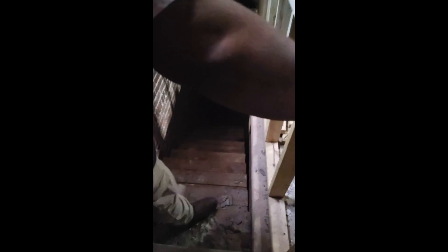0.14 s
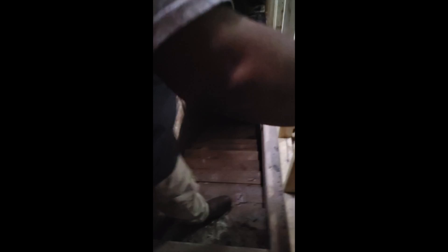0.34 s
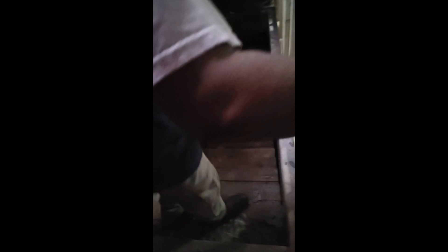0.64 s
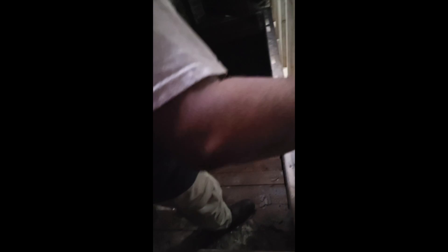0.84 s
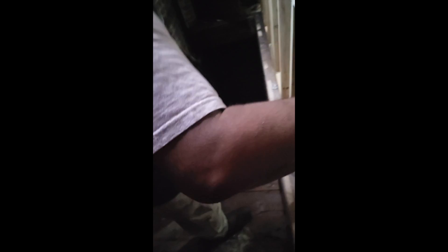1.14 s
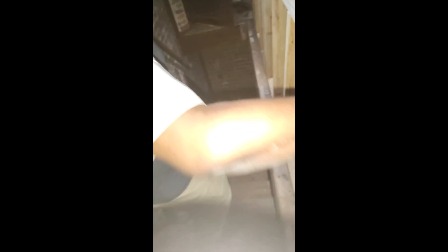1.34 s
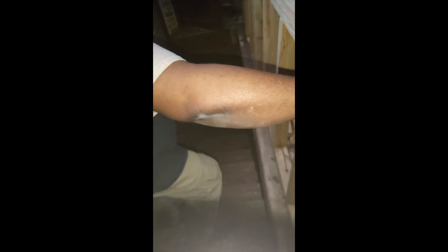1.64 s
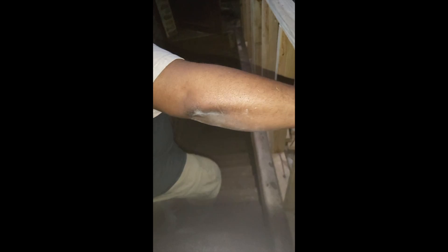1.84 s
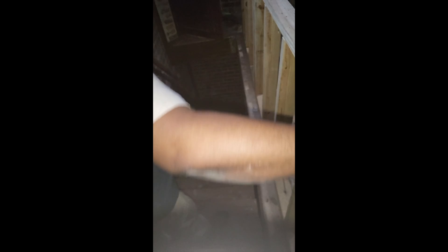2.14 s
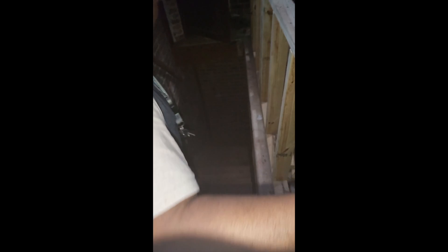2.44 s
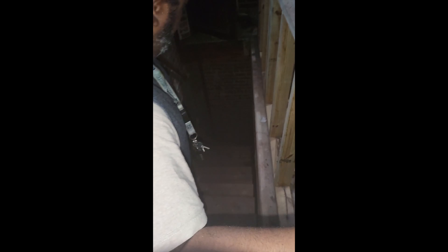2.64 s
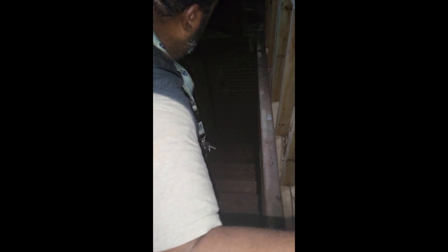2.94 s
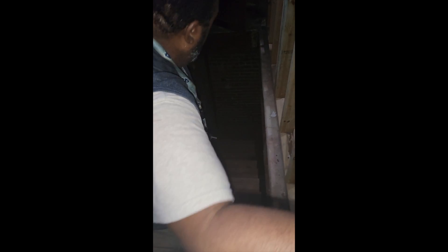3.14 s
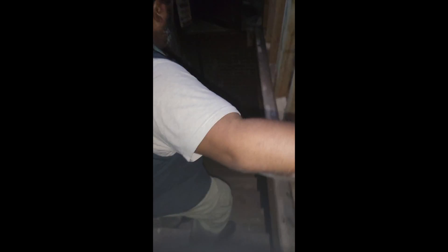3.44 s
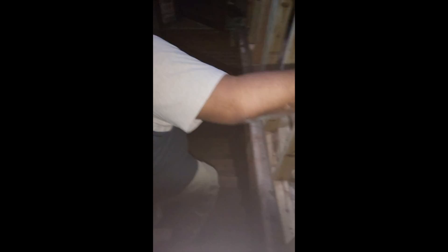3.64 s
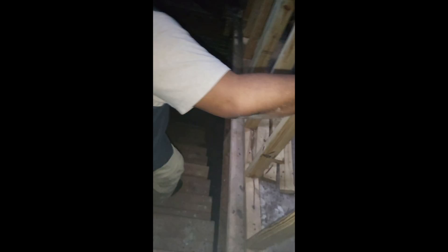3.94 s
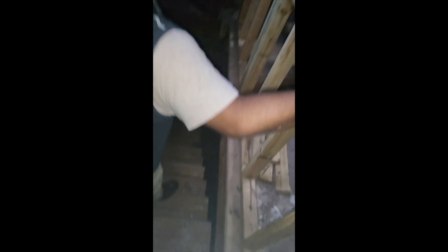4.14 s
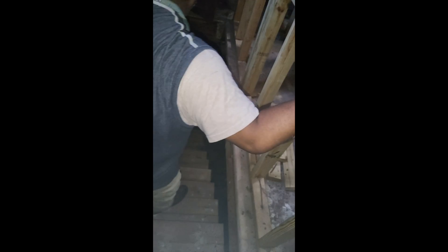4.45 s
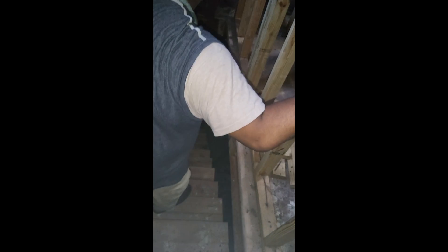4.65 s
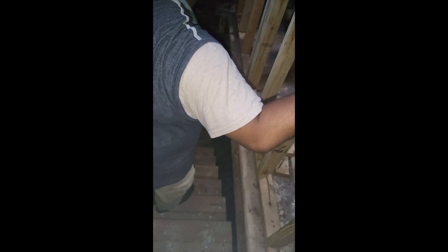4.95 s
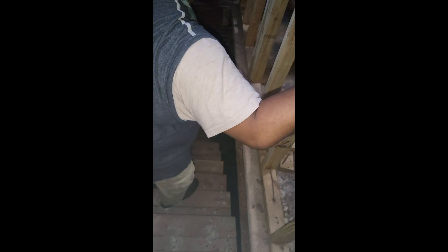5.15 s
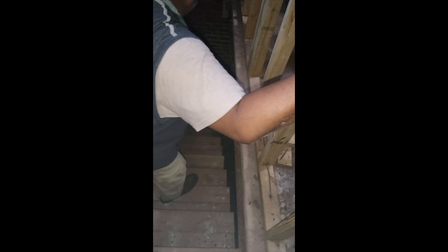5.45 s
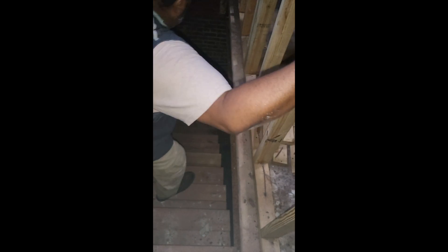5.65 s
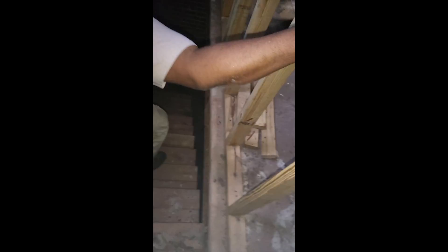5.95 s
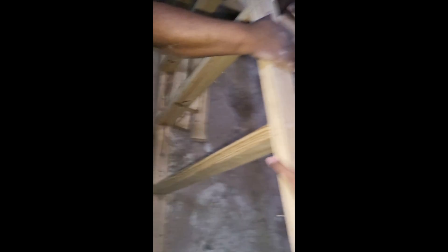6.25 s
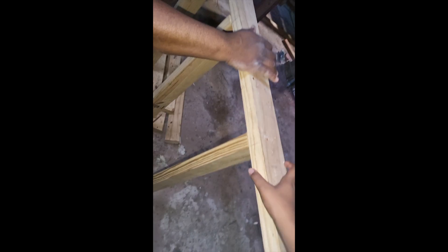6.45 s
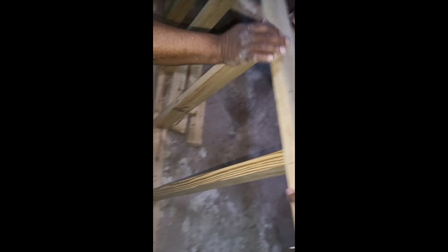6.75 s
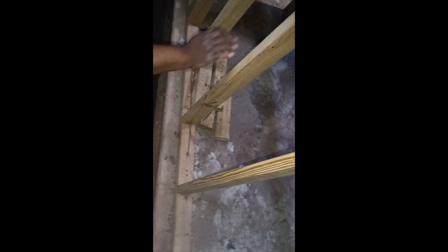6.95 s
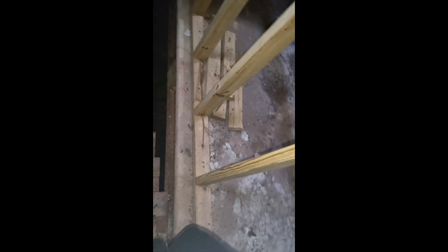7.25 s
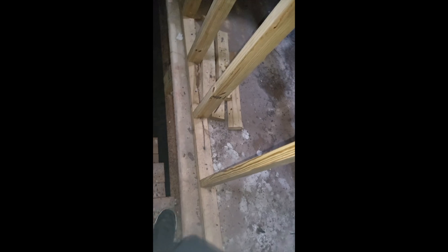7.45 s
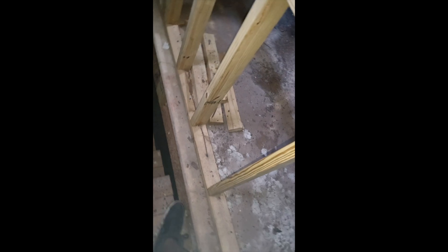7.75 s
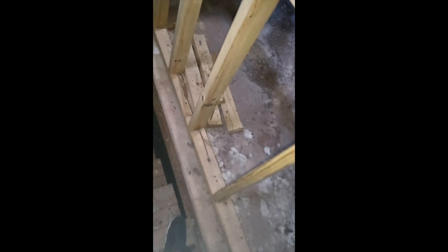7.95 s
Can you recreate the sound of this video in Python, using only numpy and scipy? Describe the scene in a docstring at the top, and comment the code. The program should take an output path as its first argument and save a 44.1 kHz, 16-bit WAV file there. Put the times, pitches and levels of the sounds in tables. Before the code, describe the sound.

A handheld stereo microphone follows someone on gritty wooden steps in a bare room with a short reverberant tail. A faint low hum runs throughout, with a low drone swelling around 0.4 seconds. After a soft scuff and small clicks, a snap at 1.1 leads into a double heel thud at 1.25, booming through the stair frame; tiny metal jingles faintly at 1.4. A sharp, loud snap strikes at 2.2. Another firm double thud with clicks and scrape comes at 3.15, then a brighter jingle at 3.45 and a soft whistling slide near 3.7. Rustle and a dull step follow at 4, then sparse small knocks and a thin far hiss. From 5.6 to 7.1, a strong sole drag opens a dense flurry of handling clicks, brushes and cloth. Light timber taps sound between 7.3 and 7.8, with a soft heel at 7.75 and closing gritty scuffs and a click near 8.

```python
"""Someone walks on gritty wooden steps in a bare building, followed closely by a handheld stereo recorder.
Heels thud as an impulse and faint noise ringing board modes; taps ring a rail.
Snaps and handling clicks, near and far, are short noise blows through resonances.
Soles, cloth and fingers near the microphones are swelling coloured noise; bits of metal jingle as rattling tones.
Filtered noise makes the stair frame's boom, a low hum, a low drone and a thin far hiss.
Thuds, taps and snaps stir the room's decaying noise."""
import sys
import numpy as np
from scipy import signal
from scipy.fft import rfft, irfft, next_fast_len
from scipy.io import wavfile
from scipy.ndimage import uniform_filter1d, map_coordinates

SR = 44100
rng = np.random.default_rng(int(sys.argv[2]) if len(sys.argv) > 2 else 0)


def wav_record(signal):
    """Record a signal, one row per channel, as 16-bit PCM in the file named by sys.argv[1]."""
    frames = np.transpose(np.atleast_2d(signal))
    bounded = np.clip(frames, -1, 1)
    # unit amplitude maps onto the largest positive 16-bit level
    quanta = np.round(bounded * 32767).astype(np.int16)
    wavfile.write(sys.argv[1], SR, quanta)


N = 356769  # length in samples

# Levels and left-right balances are those ahead of the microphone ports' own tilt.
# The steady hum of the building. Each row: frequency in Hz, relative density in dB per Hz.
HUM_SPECTRUM = [(15, -2), (25, -1.5), (118, 1), (266, -10), (368, -8.5), (524, -23.5), (1390, -27),
                (1730, -38), (2090, -27.5), (4990, -45.5), (5880, -45), (8600, -61), (11600, -44.5),
                (15200, -101), (16500, -82)]
# A thin far hiss band. Each row: time in seconds, level in dB.
HISS_LEVEL = [(0, -90), (4, -83), (4.4, -73.5), (5.3, -77.5), (6, -76), (8.09, -81)]
# A low tone that comes and goes. Each row: time in seconds, level in dB.
DRONE_LEVEL = [(0, -73), (.35, -53), (.45, -46), (1.1, -60), (1.3, -57), (2, -62.5), (8.09, -69.5)]
DRONE_HZ = 81.3
# Weight coming onto the stair frame. Each row: full strength at seconds, level in dB, held for seconds.
FRAME_LOADS = [(.1, -43.5, 0.031), (1.31, -29, 0.023), (1.53, -39, 0.014), (2.19, -39.5, 0.064),
               (3.25, -33, 0.032), (3.55, -43.5, 0.032), (4, -38.5, 0.17), (4.18, -39, 0.083),
               (5.68, -37, 0.18), (6.28, -45, 0.016), (6.6, -45, 0.022), (7.05, -47.5, 0.017),
               (7.78, -40, 0.087), (7.9, -43, 0.0075)]
LOAD_REST_DB, LOAD_RISE, LOAD_FALL = -57, 167, 65  # level between loads in dB; slopes in dB per s
# Resonances of the stair frame. Each row: frequency in Hz, width in Hz, relative level in dB.
FRAME_MODES = [(56.3, 5.7, 4.5), (83, 20.6, 2), (113, 52, -8.5), (36.8, 18, -15.5)]

# Drags of a sole. Each row: full strength at seconds, level in dB, held for seconds.
SOLE_DRAGS = [(.13, -51, 0.008), (1.25, -56.5, 0.42), (1.99, -48.5, 0.012), (2.22, -52.5, 0.046),
              (3.14, -44.5, 0.084), (3.55, -52.5, 0.26), (3.76, -62, 0.028), (4.15, -58, 0.22),
              (4.75, -56.5, 0.15), (5.69, -42, 0.08), (6.02, -51, 0.038), (6.5, -56, 0.24),
              (6.92, -56, 0.26), (7.54, -48.5, 0.069), (7.86, -50, 0.071), (8.06, -44.5, .03)]
DRAG_REST_DB, DRAG_RISE, DRAG_FALL = -63.5, 290, 86  # level between drags in dB; slopes in dB per s
# Colour of a sole on grit. Each row: frequency in Hz, relative density in dB per Hz.
SCUFF_SPECTRUM = [(180, 0), (300, -13.5), (675, 2.5), (925, -6), (1290, -1), (1600, -10.5), (5150, -24.5),
                  (5830, -23.5), (8000, -27.5), (10400, -119), (17600, -120)]
# A slide that whistles softly. Each row: time in seconds, level in dB.
SLIDE_LEVEL = [(3.5, -94), (3.62, -56), (3.72, -46), (3.82, -53), (3.92, -57), (4.05, -87)]
# Rustle of cloth near the microphones. Each row: time in seconds, level in dB.
RUSTLE_LEVEL = [(0, -64.5), (.13, -66), (.93, -69.5), (1.46, -54.5), (1.9, -68.5), (2, -59.5), (2.99, -77),
                (3.14, -56.5), (3.43, -61), (3.5, -53), (4, -50.5), (4.06, -80), (5.55, -72.5), (5.7, -53),
                (6.1, -61), (6.36, -66.5), (6.51, -60), (8.08, -65.5)]
# Quick brushes over the microphones. Each row: start in seconds, level in dB, held for seconds.
MIC_BRUSHES = [(0.092, -49, 0.052), (1.039, -62.5, 0.052), (2.6, -56.5, 0.046), (3.109, -45.5, 0.016),
               (3.5553, -73, .028), (3.6516, -49.5, 0.03), (3.9787, -49, 0.028), (4.026, -49, 0.014),
               (4.096, -55, 0.034), (5.2775, -45.5, 0.016), (5.574, -46.5, 0.017), (5.6562, -42, 0.022),
               (5.778, -45.5, .028), (5.8663, -44.5, 0.019), (5.9872, -39, 0.023), (6.124, -37.5, 0.025),
               (6.2191, -36, 0.025), (6.2672, -44, 0.0051), (6.485, -44.5, .012), (6.6766, -46, 0.011),
               (6.8966, -41.5, 0.025), (7.041, -48.5, 0.016), (7.1076, -62, 0.024), (7.217, -62, 0.012),
               (7.518, -45.5, 0.015), (8.029, -47, 0.015)]
BRUSH_PAN_DB = -4  # left over right
FADE_SHARE = 0.47  # time constant of a brush's fade, as a share of the time it was held
# Colour of cloth and brushes. Each row: frequency in Hz, relative density in dB per Hz.
CLOTH_SPECTRUM = [(880, 10), (1500, 3.5), (1830, 2), (2310, 0), (3970, -3), (7250, -2.5), (8680, -10),
                  (15200, -8), (16000, -22), (16500, -31)]

# Snaps and handling clicks, near and far. Each row: start in seconds, peak of the low ring in dB, pitch in Hz,
# treble in dB relative to that peak, 60 dB decay in seconds, left over right in dB.
SNAP_BLOWS = [(0.094, -34.5, 1230, -26, 0.028, -6), (0.448, -48.5, 4600, 4, 0.065, -1),
              (0.659, -54, 3670, 5, 0.034, -2), (0.695, -44.5, 2260, -18, 0.02, 4),
              (0.728, -43, 2230, -4, .02, 0), (1.118, -23.5, 1110, -28.5, 0.12, -3.5),
              (1.952, -29.5, 1200, -36, 0.083, -3.5), (2.153, -36.5, 1460, -13, 0.032, -2),
              (2.209, -11.5, 1385, -20.5, 0.022, 0.5), (2.513, -40, 2250, -22, 0.014, 2),
              (3.096, -37, 3200, -5, .1, 2), (3.111, -24, 1920, -17, 0.057, -5),
              (3.122, -25, 1840, -26, 0.032, -4), (3.517, -34.5, 1420, -13, 0.1, -2),
              (3.557, -36.5, 1340, -8, 0.31, -4), (3.697, -39, 900, -35, .012, -3),
              (3.719, -35, 895, -25, .012, 4), (3.738, -31.5, 1030, -25, 0.019, 0),
              (3.997, -33, 1320, -10, 0.012, -11.5), (4.026, -43, 820, -7, 0.052, -24.5),
              (4.094, -35.5, 960, -9, 0.036, -13.5), (4.302, -45.5, 1290, -24, 0.017, -19),
              (4.41, -41.5, 764, -16, 0.0099, -8), (4.776, -41, 3180, -7, 0.039, 4),
              (4.945, -41.5, 1450, -5, 0.11, -1), (5.28, -52.5, 1250, -17, .0105, -36),
              (5.538, -40, 1320, -18, 0.0091, -1), (5.575, -39.5, 1280, -12, 0.011, -12),
              (5.643, -29, 1320, -34, 0.14, 0), (5.69, -19, 1490, -25, 0.03, -2.5),
              (5.781, -29.5, 1750, -34, 0.0087, 0), (5.797, -24.5, 438, -35, 0.015, 2),
              (5.869, -43.5, 570, -31, 0.013, -31), (5.986, -24, 560, -45, 0.014, 6),
              (6.01, -23.5, 1360, -35, 0.13, 3), (6.063, -28.5, 560, -3, 0.014, -3),
              (6.117, -27, 650, -15, 0.0043, -4), (6.128, -37, 640, -14, 0.016, -13),
              (6.23, -37.5, 1310, -19, 0.0093, -33), (6.266, -48, 664, -11, 0.01, -23),
              (6.325, -47, 860, -31, .01, -15), (6.427, -29.5, 1080, -20, 0.014, -3.5),
              (6.463, -31.5, 2380, -10, 0.008, -6), (6.490, -31.5, 2550, -19, 0.011, -6),
              (6.519, -30.5, 516, -22, 0.069, -3), (6.535, -27, 1250, -14, .016, -8),
              (6.611, -35, 1170, -15, 0.011, -17), (6.572, -41.5, 3120, 0, .03, -1),
              (6.627, -36, 2260, -11, 0.01, 3), (6.683, -42, 695, -10, 0.039, -18.5),
              (6.799, -38.5, 660, -49, 0.026, -11), (6.865, -36.5, 1160, 0, 0.018, -2),
              (6.899, -28.5, 1410, 9, 0.027, 7), (6.963, -26.5, 1280, -18, 0.025, -4),
              (7.029, -38.5, 664, -2, 0.0055, -18), (7.041, -38.5, 1360, -5, 0.019, -16.5),
              (7.111, -41, 6050, 4, 0.0083, 7), (7.229, -58, 9100, 23, 0.0076, -7),
              (7.258, -37.5, 710, -0.5, 0.019, -7), (7.352, -38, 1870, -3, 0.022, -2),
              (8.036, -47, 3050, 14, 0.023, 3), (8.075, -28.5, 850, -55, 0.11, -7)]
# Angle between left and right (0 alike, 180 opposed) of a 10 ms snap; degrees less per doubling of its length.
OPPOSED_DEG, CLOSING_DEG = 116.6, 1.3
# How long the bare room rings. Each row: frequency in Hz, 60 dB decay in seconds.
HALL_DECAY = [(100, 0.64), (300, 0.37), (1300, 0.44), (2200, 0.44), (4000, 0.32), (12000, 0.045)]

# Heel falls. Each row: start in seconds, peak in dB before the bass is cut, upper knock in dB,
# left over right in dB.
HEEL_FALLS = [(1.2445, -17, -12.5, -5), (1.275, -24, -29, 2), (2.107, -31, -24, -2),
              (3.167, -15, -14.5, -5.5), (3.197, -22.5, -12.5, 2), (4.046, -32.5, -20, -16.5),
              (4.095, -35, -30, -23), (4.69, -39.5, -20, 2), (5.656, -35, -21, -7), (7.739, -26, -22, -2)]
# Modes of the boards. Each row: frequency in Hz, relative level in dB, decay in seconds before damping.
BOARD_MODES = [(252, 18, 0.14), (290, 4.5, 0.15), (334, 4, 0.35), (382, -7.5, 0.59), (620, -10, 0.4),
               (752, -19, 0.59)]

# Jingles of a small piece of metal. Each row: start in seconds, peak in dB.
METAL_JINGLES = [(1.4216, -46), (1.744, -52.5), (3.45, -36.5)]
# Modes of the metal. Each row: frequency in Hz, relative level in dB, decay in seconds before damping.
METAL_MODES = [(6860, -9.5, 0.3), (9540, -18, 1), (11670, -19, 0.99), (15160, -32, 0.23)]

# Light taps on a timber rail. Each row: start in seconds, peak in dB, favoured pitch in Hz,
# left over right in dB.
RAIL_TAPS = [(4.692, -35, 1010, -3), (5.428, -38.5, 1300, -7.5), (7.296, -30, 1270, -0.5),
             (7.432, -23.5, 1510, -1.5), (7.586, -24, 1460, -2), (7.828, -27.5, 1350, -7.5)]
# Modes of the rail. Each row: frequency in Hz, relative level in dB.
RAIL_MODES = [(430, 5.5), (755, 5.5), (1045, 3), (1190, 2), (1390, -2.5), (1560, -1.5), (2050, 0.5),
              (2420, -2), (2580, -1.5), (2820, -13.5), (3320, -10)]
# Where a tap lands favours the modes near one pitch; the loss away from it stops at a limit.
FAVOUR_DB_PER_OCT, FAVOUR_MAX_DB = 35, 14
CONTACT_S, RAIL_ATTACK_S = 0.012, 0.003  # 60 dB decay of the contact; time constant of the onset
RAIL_T60_S = 0.03  # before damping
RAIL_ROOM_DB = -10  # taps stir the room little

# Likeness of the two ports in a diffuse sound. Each row: frequency in Hz, likeness from -1 to 1.
PORT_LIKENESS = [(40, 0.65), (90, 0.75), (170, 0.85), (300, 0.35), (600, -0.37), (1200, -0.47),
                 (2500, 0.12), (12000, 0.033)]
# Sensitivity of the two ports. Each row: frequency in Hz, left over right in dB.
PORT_TILT = [(60, -2.5), (240, -3.5), (950, -2.5), (3800, -2.5), (15000, -3.5)]
TOP_HZ = 15900  # band limit of the recorder


def amp(db):
    """Decibels to amplitude."""
    return 10 ** (np.asarray(db) / 20)


def unit(x):
    """Scales to an rms of 1."""
    return x / np.sqrt(np.mean(x ** 2) + 1e-20)


def top(x):
    """Scales to a peak of 1."""
    return x / np.abs(x).max()


def along(points, hz):
    """Interpolates (Hz, value) points on a log frequency axis."""
    f, v = np.transpose(points)
    return np.interp(np.log(hz + 1), np.log(f + 1), v)


def shape(points):
    """The amplitude response that follows (Hz, dB) points."""
    return lambda hz: amp(along(points, hz))


def curve(points):
    """Interpolates (seconds, value) points to one value per sample."""
    s, value = np.transpose(points)
    return np.interp(np.arange(N) / SR, s, value)


def swells(rows, rest_db, rise, fall):
    """Level in dB: each row rises, holds and falls, their powers adding to a resting level."""
    s, db, held = np.transpose(rows)[:, :, None]
    t = np.arange(0, N + 64, 64) / SR
    before = np.clip(s - t, 0, None)
    after = np.clip(t - s - np.abs(held), 0, None)
    each = db - rise * before - fall * after
    power = amp(2 * each).sum(0) + amp(2 * rest_db)
    return np.interp(np.arange(N) / SR, t, 10 * np.log10(power))


def wobble(rate):
    """A smooth random curve through `rate` random knots a second."""
    knots = rng.standard_normal(int(N * rate / SR) + 4)
    return map_coordinates(knots, [np.arange(N) * rate / SR])


def filtered(x, response):
    """Multiplies the spectrum of x by a complex response of frequency."""
    m = next_fast_len(N + SR // 2)
    return irfft(rfft(x, m) * response(np.fft.rfftfreq(m, 1 / SR)), m)[..., :N]


def peak(hz, centre_hz, width_hz):
    """Response of one resonance, 1 at its centre."""
    return 1j * hz * width_hz / (centre_hz ** 2 - hz ** 2 + 1j * hz * width_hz)


def diffuse(pair, colour=np.ones_like):
    """Mixes two unrelated signals so left and right are as alike, or as opposed, as the ports hear them."""
    def mid_side(hz):
        turn = np.arccos(np.clip(along(PORT_LIKENESS, hz), -1, 1)) / 2
        return colour(hz) * [np.cos(turn), np.sin(turn)]

    mid, side = filtered(pair, mid_side)
    return np.array([mid + side, mid - side])


def rush(colour, slips=1):
    """Coloured stereo noise of rms 1; slips is the gain by which its size jumps about."""
    return unit(diffuse(slips * rng.standard_normal((2, N)), colour))


def add(track, s, sound, pan_db):
    """Lays a sound on the stereo track at s seconds, with left pan_db over right."""
    track[:, round(s * SR):][:, :sound.shape[-1]] += sound * amp([[pan_db / 2], [-pan_db / 2]])


def ring(modes, t, lift_db, damping, attack, scatter):
    """Decaying sines of a struck thing, at new strengths and slightly new pitches for each blow."""
    hz, db, t60 = np.transpose(modes)[:, :, None]
    strength, detune = rng.standard_normal((2, len(modes), 1))
    level_db = db + lift_db(hz) + 2 * strength - 60 * t / (t60 * damping)
    tones = amp(level_db) * np.sin(2 * np.pi * hz * (1 + scatter * detune) * t)
    return tones.sum(0) * (1 - np.exp(-t / attack))


def building():
    """The stair frame resonates under the walker's weight, over a steady hum, a low drone and a far hiss."""
    def frame(hz):
        # neighbouring resonances take opposite signs
        return sum((-1) ** k * amp(db) * peak(hz, c, w) for k, (c, w, db) in enumerate(FRAME_MODES))

    hiss = amp(curve(HISS_LEVEL)) * rush(lambda hz: peak(hz, 5870, 500) ** 2)
    drone = amp(curve(DRONE_LEVEL)) * rush(lambda hz: peak(hz, DRONE_HZ, 9.3))
    boom = amp(swells(FRAME_LOADS, LOAD_REST_DB, LOAD_RISE, LOAD_FALL)) * rush(frame)
    hum = amp(-51.5 + 0.059 * wobble(24.0)) * rush(shape(HUM_SPECTRUM))
    return boom + hiss + drone + hum


def rubbing():
    """Soles drag over grit; cloth rustles and sweeps past the microphones in short strokes."""
    scuff_db = swells(SOLE_DRAGS, DRAG_REST_DB, DRAG_RISE, DRAG_FALL)
    strokes = np.tile(amp(curve(RUSTLE_LEVEL) + 2.5 * wobble(25)), (2, 1))
    t = np.arange(SR // 4) / SR
    for s, db, held in MIC_BRUSHES:
        fade = np.exp(-np.clip(t - held, 0, 1) / (FADE_SHARE * held))
        stroke = amp(db) * np.clip(t / 0.0013, 0, 1) * fade
        add(strokes, s, stroke[:N - round(s * SR)], BRUSH_PAN_DB)
    grit = wobble(400)
    whistle = rush(lambda hz: peak(hz, 2350, 480) ** 2 + 0.2 * peak(hz, 4700, 900) ** 2)
    slide = amp(curve(SLIDE_LEVEL) + 3.5 * wobble(25)) * whistle
    soles = amp(scuff_db + 0.54 * wobble(18)) * rush(shape(SCUFF_SPECTRUM), amp(2.8 * grit))
    # the drag also stirs the wood
    boards = amp(scuff_db - 4.5 + 3.7 * wobble(13)) * rush(lambda hz: peak(hz, 369, 147) ** 2)
    cloth = strokes * rush(shape(CLOTH_SPECTRUM), amp(2.0 * grit))
    return soles + boards + crumbs(scuff_db - 4.5, count=1800) + cloth + slide


def crumbs(level_db, count):
    """Tiny grains crack at random as short decaying sines whose level follows the drag of the sole."""
    where, size, pitch, side = rng.random((count, 4)).T
    t = np.arange(128) / SR
    hz = (900 * 6.5 ** pitch)[:, None]
    start = (where * (N - len(t))).astype(int)
    strength = amp(level_db[start] - 6.5 * np.log(size + 0.028))[:, None]
    grain = strength * np.sin(2 * np.pi * hz * t) * np.exp(-t * hz / 4.1)
    at = (start[:, None] + np.arange(len(t))).ravel()
    shares = (1 - side / 2, -0.5 - side / 2)  # left and right in opposite sign
    return np.array([np.bincount(at, (grain * share[:, None]).ravel(), N) for share in shares])


def snaps():
    """Short noisy blows ring about a pitch, with a broad crack above and a tick of treble.

    Returns the direct sound and the room feed: dull snaps are far and wet, bright ones near and dry."""
    track, feed = np.zeros((2, N + SR)), np.zeros((2, N + SR))
    t = np.arange(4096) / SR
    f = np.fft.rfftfreq(len(t), 1 / SR)
    for s, db, hz, treble_db, t60, pan_db in SNAP_BLOWS:
        turn = np.radians(OPPOSED_DEG - CLOSING_DEG * np.log2(100 * t60)) / 2
        mid, side = rng.standard_normal((2, len(t))) * [[np.cos(turn)], [np.sin(turn)]]
        # long crunches also build more slowly
        burst = np.array([mid + side, mid - side]) * (1 - np.exp(-t / (0.0049 * t60)))
        hard_contact = 6 * np.exp([[1j * turn], [-1j * turn]])  # one click leads
        blow = rfft(burst * amp(-60 * t / max(t60, 0.003))) + hard_contact
        modes = peak(f, hz, 0.2 * hz) - 0.35 * peak(f, 0.48 * hz, 0.2 * hz) - 0.7 * peak(f, 1.9 * hz, 0.3 * hz)
        low_ring = irfft(blow * modes * peak(f, hz, 1.4 * hz))
        crack = irfft(blow * peak(f, 2760, 3950) ** 2)
        tick = irfft(rfft(burst * amp(-60 * t / 0.0045)) * peak(f, 12900, 11000) ** 2)
        body = top(low_ring) + amp(0.49 * treble_db + 2) * top(crack)
        add(track, s, amp(db) * (body + amp(treble_db) * top(tick)), pan_db)
        # the room is fed the resonances without the noise, at the body's energy
        clean_ring = top(irfft(modes * peak(f, hz, 0.74 * hz)))
        clean_crack = top(irfft(peak(f, 3470, 2800) ** 2))
        clean = clean_ring + amp(0.42 * treble_db + 2.0) * clean_crack
        match = np.linalg.norm(body[0]) / np.linalg.norm(clean)
        add(feed, s, clean * match * amp(db - 0.064 * treble_db - 10.0), 0)
    return track[:, :N], feed[0, :N]


def hall(x):
    """The bare room answers with noise tails, each frequency dying at its own speed, new for each stretch."""
    wet, step = np.zeros((2, N + 2 * SR)), SR // 3
    for start in range(0, N, step):
        hz, t, z = signal.stft(rng.standard_normal((2, SR * 3 // 4)), SR, nperseg=256)
        decay = amp(-60 * t / along(HALL_DECAY, hz)[:, None])
        tail = signal.istft(z * decay, SR, nperseg=256)[1]
        tail = tail / np.linalg.norm(tail[0])
        part = signal.fftconvolve(x[None, start:start + step], tail, axes=1)
        wet[:, start + 200:][:, :part.shape[1]] += part  # 200 samples of delay
    return diffuse(wet[:, :N], lambda hz: 1 + 0.49 * np.abs(peak(hz, 1276, 260)) ** 2)  # favours one band


def heels():
    """An impulse and a faint decaying noise ring the boards.

    Each fall also sounds upper modes and a short dull clack, at its own knock level."""
    track, t = np.zeros((2, N + SR)), np.arange(SR // 4) / SR
    for s, db, knock_db, pan_db in HEEL_FALLS:
        excitation = 0.016 * rng.standard_normal(len(t)) * amp(-60 * t / 0.49)
        excitation[0] = 1  # the impulse
        wood = ring(BOARD_MODES, t, lambda hz: (knock_db + 27.0) * (hz > 500),
                    damping=0.049, attack=0.0029, scatter=0.025)
        clack = amp(knock_db + 7.5 - 60 * t / 0.0066) * np.sin(2 * np.pi * 1150 * t)
        add(track, s, amp(db) * top(signal.fftconvolve(excitation, wood + clack)), pan_db)
    # narrow boards radiate little bass
    return filtered(track[:, :N], lambda hz: (hz ** 2 / (hz ** 2 - 235 ** 2 - 1j * hz * 250)) ** 2)


def jingles():
    """A small piece of metal ticks against another and rattles, which roughens its ring."""
    track, t = np.zeros((2, N + SR)), np.arange(SR // 4) / SR
    for s, db in METAL_JINGLES:
        tones = ring(METAL_MODES, t, np.zeros_like, damping=0.28, attack=0.0005, scatter=0.002)
        rattle = 0.25 + 0.75 * unit(uniform_filter1d(rng.standard_normal(len(t)), size=90))
        add(track, s, amp(db) * top(tones * rattle), -3)
    return track[:, :N]


def taps():
    """A brief uneven contact rings the rail's modes; the two ports hear them out of step."""
    track, t = np.zeros((2, N + SR)), np.arange(SR // 10) / SR
    modes = [(hz, db, RAIL_T60_S) for hz, db in RAIL_MODES]
    port_phase = np.exp(0.5j * np.radians([[OPPOSED_DEG], [-OPPOSED_DEG]]))
    for s, db, favoured_hz, pan_db in RAIL_TAPS:
        def lift(hz):
            return -np.minimum(FAVOUR_DB_PER_OCT * np.abs(np.log2(hz / favoured_hz)), FAVOUR_MAX_DB)

        contact = 0.05 * rng.standard_normal(len(t)) * amp(-60 * t / CONTACT_S)
        contact[0] = 1
        rail = ring(modes, t, lift, damping=0.7, attack=RAIL_ATTACK_S, scatter=0.01)
        wood = signal.hilbert(signal.fftconvolve(contact, rail))
        add(track, s, amp(db) * top(np.real(wood * port_phase)), pan_db)
    return track[:, :N]


def scene():
    """Sums the direct sounds, the room's answer to the blows, and the building's background."""
    thuds, knocks, (clicks, snap_feed) = heels(), taps(), snaps()
    room_feed = amp(-1.0) * thuds.mean(0) + amp(RAIL_ROOM_DB) * knocks[1] + snap_feed
    return thuds + knocks + clicks + jingles() + hall(room_feed) + rubbing() + building()


def record(dry):
    """The right port is more sensitive; nothing passes above the band limit."""
    def ports(hz):
        return amp(np.array([[0.5], [-0.5]]) * along(PORT_TILT, hz)) * (hz < TOP_HZ)

    return filtered(dry, ports)


dry = scene()
out = record(dry)
wav_record(out)
```